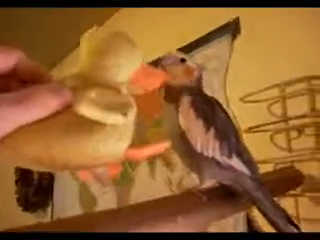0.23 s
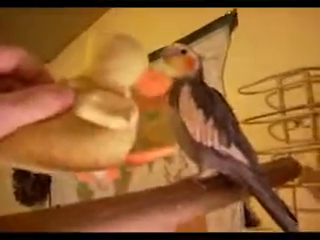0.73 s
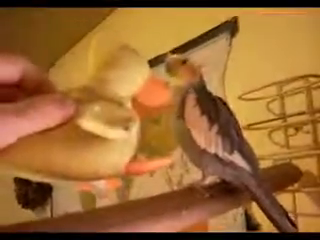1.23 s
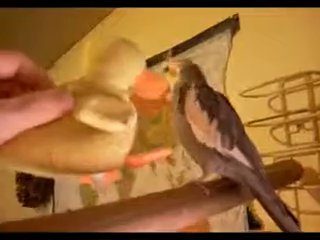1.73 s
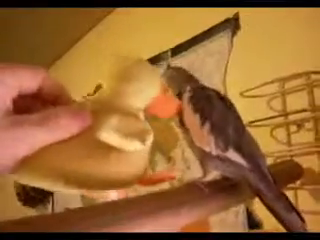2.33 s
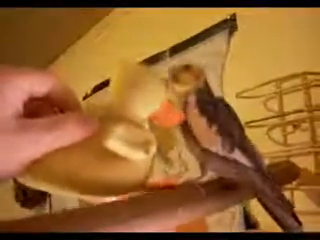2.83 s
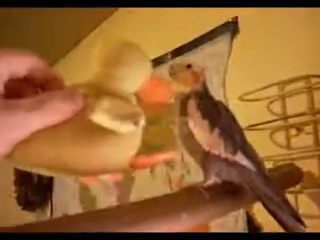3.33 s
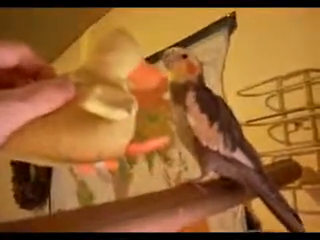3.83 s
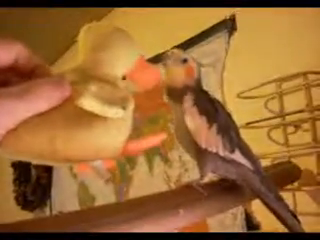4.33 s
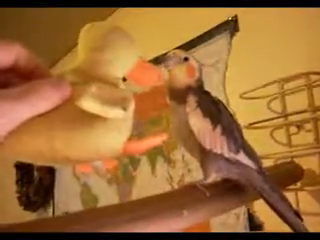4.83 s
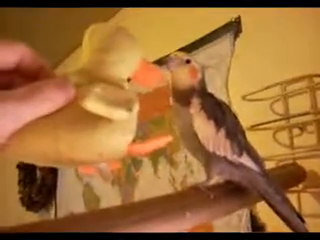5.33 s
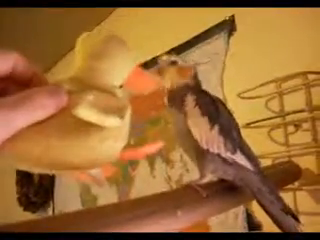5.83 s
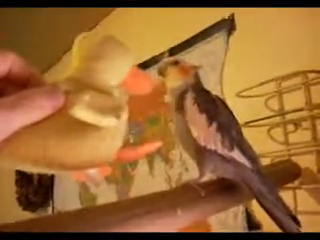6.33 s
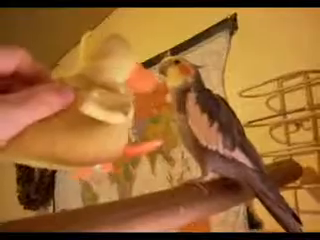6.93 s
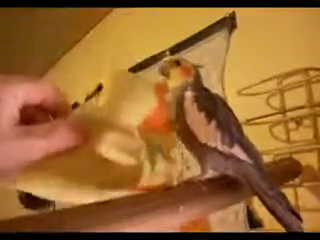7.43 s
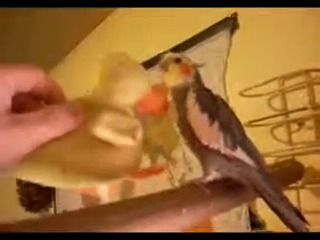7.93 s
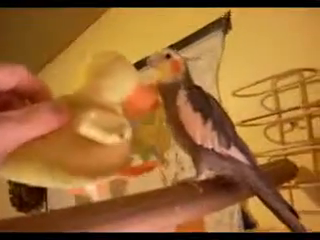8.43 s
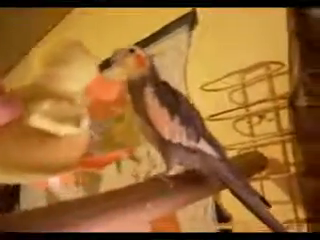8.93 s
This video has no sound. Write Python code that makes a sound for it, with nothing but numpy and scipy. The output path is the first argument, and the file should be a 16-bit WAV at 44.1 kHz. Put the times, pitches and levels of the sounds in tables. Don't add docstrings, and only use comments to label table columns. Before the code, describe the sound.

Gentle scratchy bird warbles, a pause, piercing upward whistles, softer warbling again and louder whistles to finish, with constant low buzzing and hiss underneath.

```python
import sys
import numpy as np
from scipy import signal
from scipy.fft import rfft, irfft, next_fast_len
from scipy.io import wavfile
from scipy.ndimage import uniform_filter1d, map_coordinates

SR = 44100
rng = np.random.default_rng(int(sys.argv[2]) if len(sys.argv) > 2 else 0)


def put_to_file(sound):
    columns = np.atleast_2d(sound).T
    safe = np.clip(columns, -1, 1)
    whole_steps = np.round(safe * 32767)
    wavfile.write(sys.argv[1], SR, whole_steps.astype(np.int16))


def volts_from_db(level):
    exponent = np.asarray(level, float) / 20
    return 10 ** exponent


N = 405719
FRAME_HZ = 14.972
RATE_HZ = 8000


def unit(x):
    return x / np.sqrt(np.mean(x ** 2) + 1e-20)


def along(points, hz):
    f, v = np.transpose(points)
    return np.interp(np.log(hz + 1), np.log(f + 1), v)


def wobble(rate):
    knots = rng.standard_normal(int(N * rate / SR) + 4)
    return map_coordinates(knots, [np.arange(N) * rate / SR])


def filtered(x, response):
    m = next_fast_len(N + SR // 2)
    spectrum = rfft(x, m) * response(np.fft.rfftfreq(m, 1 / SR))
    return irfft(spectrum, m)[..., :N]


def sing(kinds, rasp_per_db):
    soft_db = -29
    notes = []
    for rows, shape, scoop_hz, sag_hz, effort_db, dropout_db, rasp_db in kinds:
        share, glide, under_db = np.transpose(shape)
        bend = scoop_hz * (share == share[0]) + sag_hz * (share == share[-1])
        for s, length, from_hz, to_hz, db in rows:
            short_khz = (1 - glide) * abs(to_hz - from_hz) / 1000
            level = db + under_db - effort_db * short_khz
            hz = from_hz + (to_hz - from_hz) * glide - bend
            rasp = rasp_db - rasp_per_db * (level - soft_db)
            notes.append(np.transpose([s + length * share, hz, level, dropout_db + 0 * hz, rasp]))
    return notes


# share of the length [0-1], share of the glide [0-1], level against the peak in dB.
HELD = [(3.822, .04, 2440, 2420, -21), (4.059, .103, 2350, 2470, -15.5), (7.996, .034, 2265, 2290, -21),
        (8.242, .106, 2350, 2310, -15), (8.459, .111, 2230, 2470, -11.5), (8.673, .125, 2180, 2420, -12),
        (9.146, .085, 2290, 2400, -10.5)]
HELD_SHAPE = [(0, 0, -5), (.1, .01, -2), (.55, .7, 0.2), (.86, .99, -3), (1, .99, -10)]
LEADS = [(4.426, .117, 2180, 2450, -16.5), (7.933, .062, 2364, 2285, -14), (7.72, .055, 2560, 2860, -11.5),
         (8.914, .054, 2200, 2400, -11.5), (3.756, .065, 2370, 2450, -18.5)]
LEAD_SHAPE = [(0, 0, -7), (.1, .03, -2), (.4, .25, -1), (1, .99, -.1)]
SWEEPS = [(3.574, .037, 2540, 2810, -11), (3.868, .025, 2520, 2840, -15), (4.544, .023, 2500, 2760, -14),
          (4.765, .101, 2120, 2750, -11.5), (5.063, .142, 2160, 2757, -12)]
SWEEP_SHAPE = [(0, 0, -9), (.06, .01, -.5), (.25, .02, 0.3), (.6, .38, -1), (.87, .88, 0.6), (1, .98, -8.5)]
RUSHES = [
    (8.055, .106, 2380, 2880, -2.7),
]
RUSH_SHAPE = [(0, 0, -13), (.2, .2, -10), (.45, .7, 0.16), (.78, .99, -4), (1, .97, -8)]
SURGES = [
    (8.969, .036, 2410, 2780, -2.5),
    (4.218, .051, 2170, 2740, -5.5),
]
SURGE_SHAPE = [(0, 0, -2), (.75, .72, -.1), (1, .99, -9)]
CRESTS = [(3.674, .026, 2800, 2850, -28), (3.9, .034, 3040, 3220, -4), (4.302, .039, 2920, 2870, -15),
          (4.872, .04, 2830, 2810, -21.5), (4.913, .042, 2825, 2820, -22), (5.21, .035, 2860, 2900, -18.5),
          (7.822, .02, 3080, 2830, -21), (9.011, .025, 2900, 3100, -11.5), (9.037, .016, 2600, 2900, -17)]
CREST_SHAPE = [(0, 0, -9), (.42, .7, 0.7), (.8, .99, -5), (1, .9, -9)]
TOPS = [(3.617, .053, 3020, 3135, -10), (3.937, .027, 3210, 3210, -18), (4.572, .054, 2850, 3065, -8),
        (7.776, .043, 2980, 3120, -18), (4.27, .03, 2740, 2900, -15.5)]
TOP_SHAPE = [(0, 0, -6), (.3, .8, -.1), (.8, .99, -1), (1, .95, -5)]
# notes, shape, onset scoop in Hz, closing sag in Hz, loss in dB per kHz short of the goal,
# dropout in dB, rasp in dB.
LOUD_KINDS = [
    (HELD, HELD_SHAPE, 100, 110, .1, 1.2, -23),
    (LEADS, LEAD_SHAPE, 20, 1, .1, 3, -22),
    (SWEEPS, SWEEP_SHAPE, 25, 1, 11.5, 1.5, -21),
    (RUSHES, RUSH_SHAPE, 5, 70, .1, 1.2, -21),
    (SURGES, SURGE_SHAPE, 5, 1, 20, 1.5, -21),
    (CRESTS, CREST_SHAPE, 5, 1, .1, 3, -21),
    (TOPS, TOP_SHAPE, 5, 10, 12, 1, -20),
]


def loud_chirps():
    return sing(LOUD_KINDS, rasp_per_db=.02)


# share of the length [0-1], share of the glide [0-1], level against the peak in dB.
ARCHES = [
    (1.328, .122, 2690, 2994, -26.5),
    (6.392, .095, 2830, 3220, -24),
    (6.528, .162, 2690, 3120, -25),
    (.885, .065, 3000, 3110, -35),
]
ARCH_SHAPE = [(0, 0, -9), (.14, .25, -2), (.68, .99, 1.2), (.85, .92, -1), (1, .7, -9)]
CLIMBS = [
    (1.5, .128, 2720, 3430, -30),
    (1.69, .145, 2760, 3200, -27.5),
]
LIFTS = [
    (1.895, .081, 2244, 3050, -30),
    (5.73, .069, 2239, 2780, -31),
    (6.755, .08, 2174, 2980, -33),
    (6.075, .05, 2700, 3040, -25),
]
LIFT_SHAPE = [(0, 0, -16), (.5, .55, -9), (1, .99, -.1)]
FALLS = [(1.21, .065, 3370, 3240, -25), (1.977, .093, 3040, 2740, -22), (5.803, .063, 2850, 2870, -16.5),
         (6.126, .076, 3070, 2790, -20.5), (6.836, .15, 3050, 2680, -27), (1.157, .036, 2950, 3200, -25),
         (1.08, .045, 2550, 2440, -27), (5.918, .033, 2450, 2430, -25.5)]
FALL_SHAPE = [(0, 0, -5), (.25, .01, 0.3), (.75, .6, -3), (1, .99, -9)]
SLIDES = [(2.075, .075, 2590, 1900, -30), (7.005, .09, 2310, 1830, -38), (6.275, .05, 2426, 2200, -30),
          (6.326, .055, 2200, 2390, -29), (5.985, .04, 2400, 2330, -28), (6.045, .025, 2350, 2390, -28)]
SLIDE_SHAPE = [(0, 0, -4), (.5, .5, -.1), (1, .99, -6)]
MURMURS = [(.845, .039, 2700, 2900, -40), (.955, .07, 2780, 2850, -44), (1.03, .049, 2503, 2600, -37.5),
           (1.48, .019, 2490, 2700, -35), (5.867, .05, 2880, 2850, -42), (5.954, .03, 2430, 2400, -38),
           (6.205, .065, 2720, 2700, -30), (1.63, .025, 3150, 3000, -45), (6.493, .025, 3100, 3000, -41),
           (1.836, .055, 2900, 2350, -43), (1.276, .045, 3100, 2500, -40), (1.128, .026, 2500, 2700, -44)]
MURMUR_SHAPE = [(0, 0, -2), (.3, .3, -.1), (1, .99, -3)]
# notes, shape, onset scoop in Hz, closing sag in Hz, loss in dB per kHz short of the goal,
# dropout in dB, rasp in dB.
WARBLE_KINDS = [
    (ARCHES, ARCH_SHAPE, 50, 5, .1, 2.5, -13.5),
    (CLIMBS, ARCH_SHAPE, 20, 5, 8, 4, -14),
    (LIFTS, LIFT_SHAPE, 5, 1, .1, 4, -10),
    (FALLS, FALL_SHAPE, 5, 5, .1, 2, -12.5),
    (SLIDES, SLIDE_SHAPE, 5, 5, .1, 2.5, -18),
    (MURMURS, MURMUR_SHAPE, 5, 5, .1, 9, -11.5),
]


def soft_warbles():
    return sing(WARBLE_KINDS, rasp_per_db=0.67)


def voicing(syllables, size):
    t = np.arange(N) / SR
    sounding = sum((t >= rows[0][0]) & (t <= rows[-1][0]) for rows in syllables)
    return uniform_filter1d(1. * sounding, size=size)


# time in seconds, width in ms, depth in dB.
CATCHES = [(1.089, 2, 16), (1.095, 2, 10), (1.262, 2, 14), (1.381, 6, 8), (1.396, 2.5, 10), (1.779, 4, 15),
           (1.799, 6, 24), (2.027, 2.5, 15), (2.038, 6, 11), (2.059, 2.5, 24), (3.847, 3, 12),
           (4.288, 8, 10), (4.861, 2, 11), (4.923, 2, 16), (5.189, 2, 11), (5.839, 2.5, 21),
           (5.856, 2.5, 17), (6.416, 3, 25), (6.425, 2.5, 10), (6.447, 2, 18), (6.457, 2.5, 18),
           (6.465, 4.5, 22), (6.599, 2.5, 18), (6.615, 3, 15), (6.625, 4, 9), (6.676, 3, 17), (7.788, 4, 9),
           (7.801, 2, 11), (8.136, 2.5, 3.5), (8.149, 2.5, 5)]


def catches():
    t = np.arange(N) / SR
    return volts_from_db(-sum(db * np.exp(-((t - s) * 2000 / ms) ** 2) for s, ms, db in CATCHES))


def bird():
    t = np.arange(N) / SR
    chirps, warbles = loud_chirps(), soft_warbles()
    syllables = sorted(chirps + warbles, key=lambda rows: rows[0][0])
    s, hz, db, dropout_db, rasp_db = np.concatenate(syllables).T
    pitch = uniform_filter1d(np.interp(t, s, hz), size=300) * (1 + .003 * wobble(90))
    turn = 2 * np.pi * np.cumsum(pitch) / SR
    gate = voicing(chirps, size=110) + voicing(warbles, size=900)
    level_db = np.interp(t, s, db)
    high, soft = (pitch - 2450) / 300, (-19 - level_db) / 6
    shaky = np.clip(np.maximum(high, soft), .1, 1)
    stutter_db = -shaky * np.abs(np.interp(t, s, dropout_db)) * np.maximum(wobble(190), 0) ** 2
    smear = wobble(750) * np.sin(turn) + wobble(750) * np.cos(turn)
    rasp = volts_from_db(np.interp(t, s, rasp_db)) * smear
    return catches() * gate * volts_from_db(level_db + 1.5) * (volts_from_db(stutter_db) * np.sin(turn) + rasp)


# frequency in Hz, time to fall 60 dB in seconds.
ROOM = [
    (1500, .21),
    (3500, .2),
]


def room(x):
    wet, step = np.zeros(N + SR), SR // 4
    for start in range(0, N, step):
        hz, t, z = signal.stft(rng.standard_normal(SR // 2), SR, nperseg=256)
        decay = volts_from_db(-60 * t / along(ROOM, hz)[:, None])
        tail = signal.istft(z * decay, SR, nperseg=256)[1]
        answer = signal.fftconvolve(x[start:start + step], tail / np.linalg.norm(tail))
        wet[start + 200:][:len(answer)] += answer
    return wet[:N]


# time into the frame in ms, size in full scale,
# rise in ms, decay in ms, size scatter as a share.
READOUT = [
    (15.5, -.022, .3, .5, .4),
    (17.2, -.02, 1.2, 4.5, .3),
    (31, .014, .9, 2.2, .35),
    (48.9, -.04, .3, .5, .9),
    (50.4, -.03, 1.2, 6, .33),
    (63.5, .024, 1.5, 3.5, .3),
]


def readout(jitter_ms=.08):
    buzz, t = np.zeros(N + SR), np.arange(SR // 20) / SR * 1000
    frames = np.arange(int(N / SR * FRAME_HZ) + 1) / FRAME_HZ
    for ms, size, rise, decay, scatter in READOUT:
        chance = rng.standard_normal((len(frames), 2))
        at = ((frames + (ms + jitter_ms * chance[:, 0]) / 1000) * SR).astype(int)
        train = np.bincount(at, size * (1 + scatter * chance[:, 1]), N + SR)
        pulse = np.exp(-t / decay) - np.exp(-t / rise)
        buzz += signal.fftconvolve(train, pulse)[:N + SR]
    return filtered(buzz[:N], lambda hz: 1j * hz / (32 + 1j * hz))


def row_ticks(count=17, apart_ms=1.9):
    halves = np.arange(int(N / SR * FRAME_HZ * 2))[:, None] / FRAME_HZ / 2
    k = np.arange(count)
    uneven = 1 + 0.96 * rng.standard_normal((len(halves), count))
    sizes = .005 * np.exp(-k / 9) * uneven
    at = ((halves + (1.6 + k * apart_ms) / 1000) * SR).astype(int)
    train = np.bincount(at.ravel(), sizes.ravel(), N)[:N]
    return signal.fftconvolve(train, np.hanning(50), "same")


# frequency in Hz, density in dB per Hz.
HISS = [(71, -26), (120, -0.5), (238, -5.5), (260, -9), (314, -5), (472, -9.5), (613, -9), (660, -11.5),
        (2380, -21.5), (3900, -29), (5070, -60), (8580, -120)]


def hiss():
    noise = unit(filtered(rng.standard_normal(N), lambda hz: volts_from_db(along(HISS, hz))))
    strain = np.cos(8 * np.pi * (FRAME_HZ * np.arange(N) / SR - .01))
    return volts_from_db(-47.5 + 2 * strain + 0.79 * wobble(40)) * noise


def scene():
    voice = bird()
    whistle = voice + volts_from_db(-14.5) * room(voice)
    camera = volts_from_db(2.5) * readout() + row_ticks() + hiss()
    return (whistle + camera)[None]


# time in seconds, depth [0-1].
SLIPS = [
    (5.135, 1),
    (8.268, 1),
    (8.335, 1),
]


def sampled(x):
    t = np.arange(N) / SR
    lost = sum(depth * np.exp(-((t - s) * RATE_HZ / 0.99) ** 2) for s, depth in SLIPS)
    return filtered(x * (1 - lost), lambda hz: np.sqrt(np.clip((RATE_HZ / 2 + 40 - hz) / 80, 0, 1)))


# frequency in Hz, gain in dB.
UPSAMPLER = [(3500, 2.5), (4000, 0), (4600, -13), (5000, -27.5), (5350, -44.5), (5600, -63.5), (5800, -78),
             (6600, -110)]


def stepped_up(x):
    t = np.arange(N) / SR
    mirrored = x * (1 + 2 * np.cos(2 * np.pi * RATE_HZ * t))
    return filtered(mirrored, lambda hz: volts_from_db(along(UPSAMPLER, hz)))


# low edge in Hz, high edge in Hz, noise against the whistle
# in dB, loss in dB per 100 Hz that the whistle lies outside, most loss in dB.
BANDS = [
    (1410, 2190, -18, 7.5, 21.5),
    (2190, 3074, -14.5, 8.5, 40.5),
    (3080, 3830, -11, 7.5, 38),
    (3940, 5400, -15.5, 6.5, 55.5),
]


def band_noise(x, squeeze=0.86):
    total = np.zeros(N)
    gaps = np.maximum(wobble(230), 0) ** 2
    for lo, hi, under_db, loss_db, most_db in BANDS:
        def reach(hz):
            outside = np.clip(np.maximum(lo - hz, hz - hi), 0, None)
            return volts_from_db(-np.minimum(loss_db / 100 * outside, most_db)) * (hz > 1300)

        def band(hz):
            return np.clip(np.minimum(hz - lo, hi - hz) / 120 + .5, 0, 1)

        heard = filtered(x, reach)
        size = np.abs(uniform_filter1d(heard ** 2, size=130)) ** (squeeze / 2)
        grit = volts_from_db(2.0 * wobble(60) - 18 * gaps) * rng.standard_normal(N) * np.sqrt(SR / 2 / (hi - lo))
        total += filtered(volts_from_db(under_db - 0.5) * size * grit, band)
    return total


def limited(x):
    power = uniform_filter1d(uniform_filter1d(x ** 2, size=40), size=40)
    swing = np.sqrt(2 * np.abs(power))
    return np.clip(x / (1 + (swing / 1.08) ** 4) ** .25, -.95, .95)


def roll_off(x):
    return signal.sosfilt(signal.butter(12, 16000, fs=SR, output="sos"), x)


def record(dry):
    x = stepped_up(sampled(dry[0]))
    x = limited(x + band_noise(x))
    return roll_off(x[None])


dry = scene()
out = record(dry)
put_to_file(out)
```